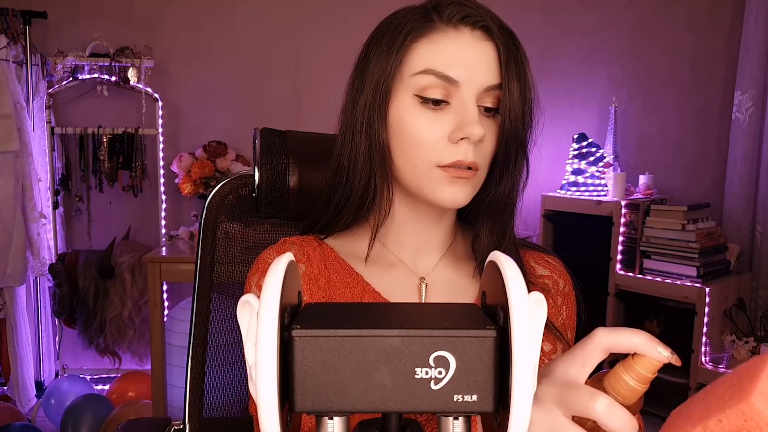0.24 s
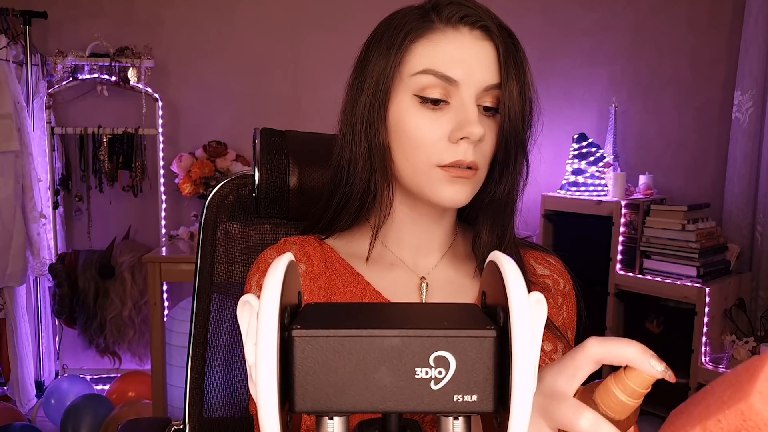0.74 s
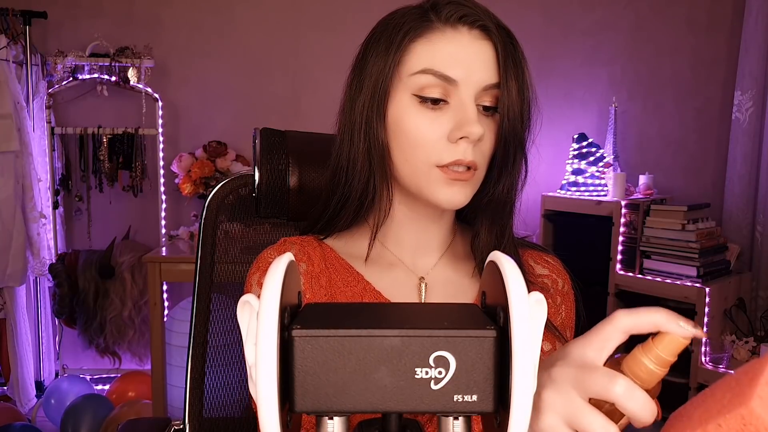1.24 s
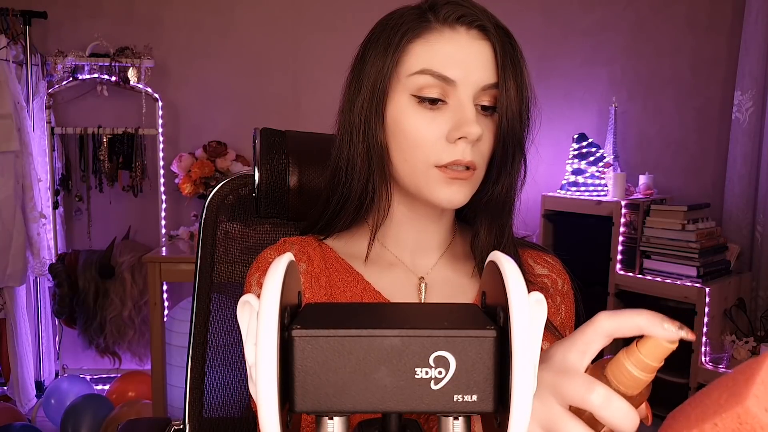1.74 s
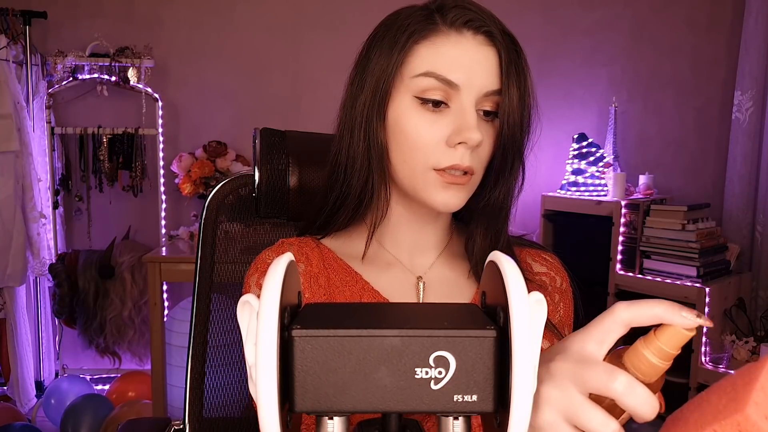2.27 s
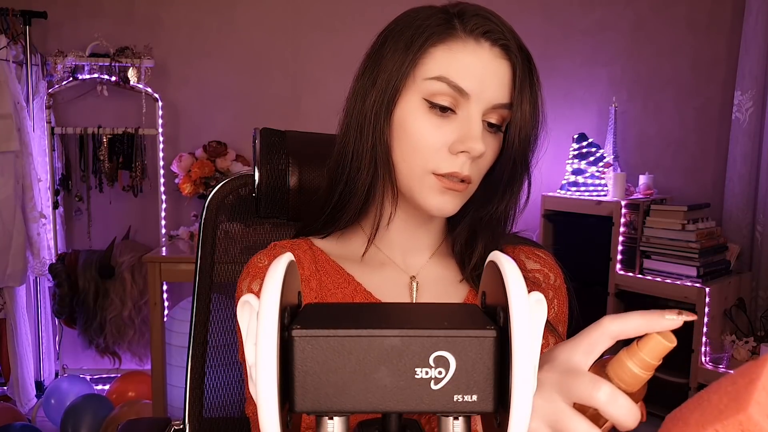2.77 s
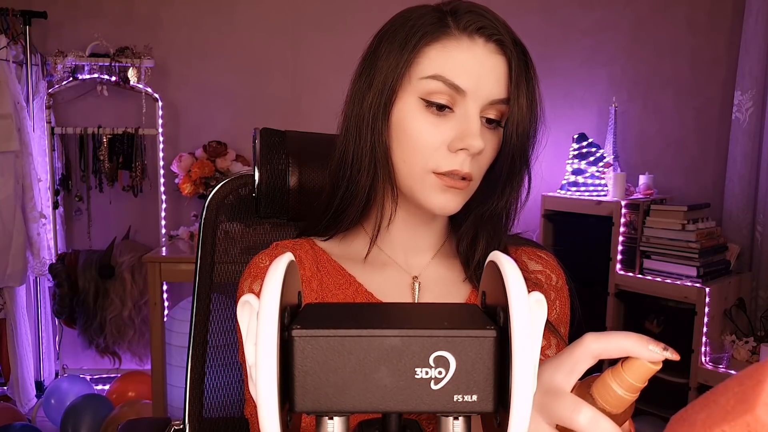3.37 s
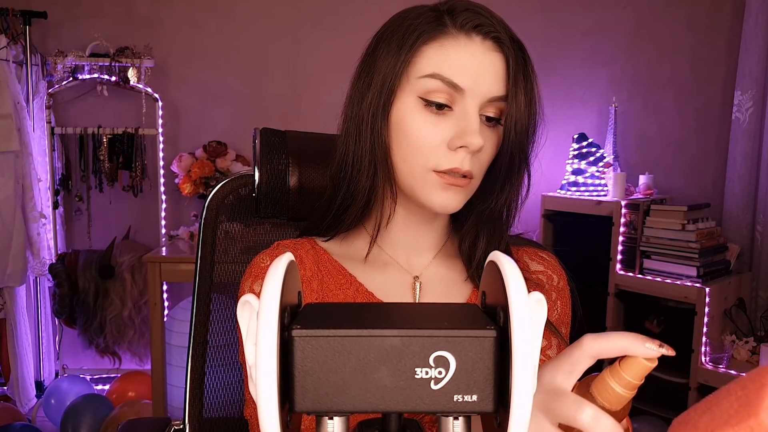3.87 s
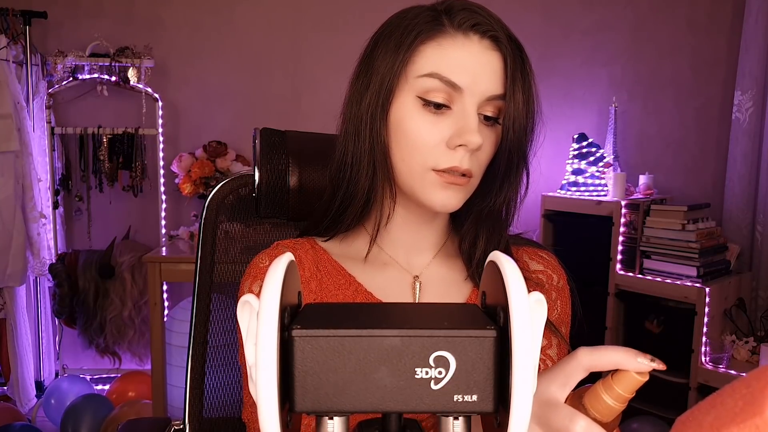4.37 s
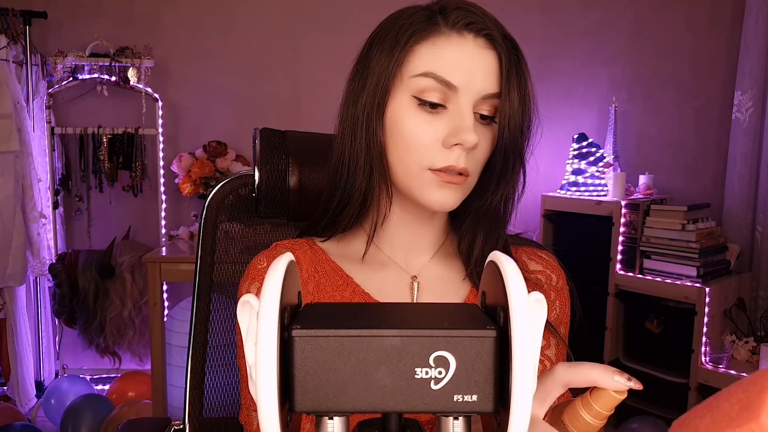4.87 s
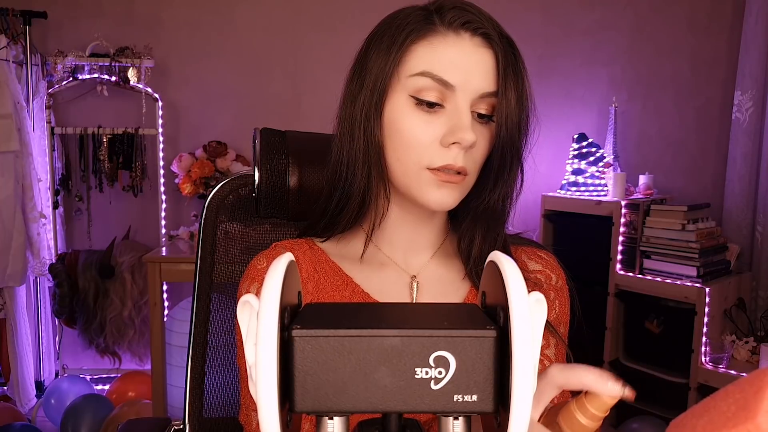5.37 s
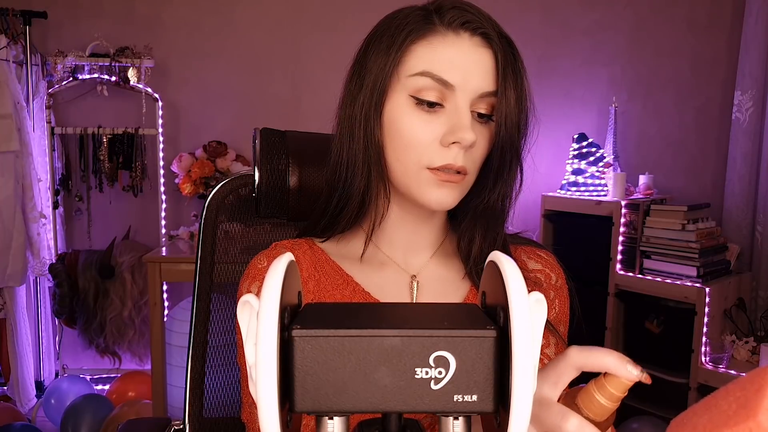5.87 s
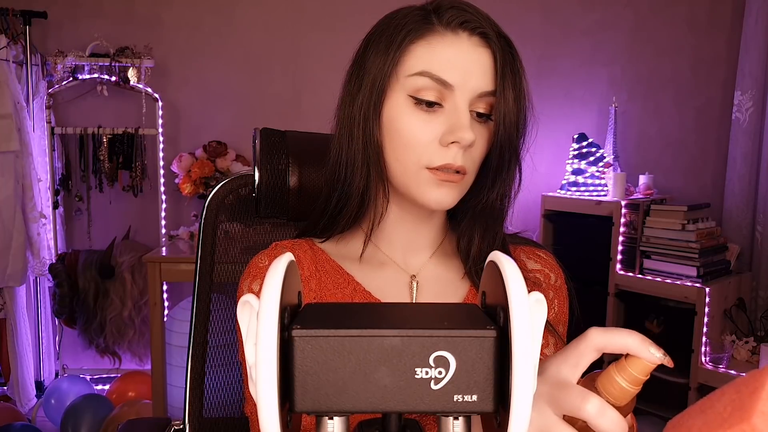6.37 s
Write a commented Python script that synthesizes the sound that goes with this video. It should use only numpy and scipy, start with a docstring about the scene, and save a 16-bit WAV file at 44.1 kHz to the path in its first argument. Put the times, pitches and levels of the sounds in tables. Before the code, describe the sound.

Close, steady spritzes from a small pump sprayer at the right, about two per second, with gurgly refill sucks, clicks and knocks between them.

```python
"""In a small furnished room, a plastic pump bottle is spritzed twelve times beside a listener's right ear.
Each stroke: the finger nudges the cap, a burst of noise hisses from the nozzle, then the piston springs back.
It slurps up liquid (the faster, the louder), thumps on its stop, and the ball valve drops shut.
Hiss and slurp are shaped noise; knocks and ticks are dying sine waves.
The room adds a noise-like tail and booming low notes, over a steady rumble and faint hiss."""
import sys
import numpy as np
from scipy import signal
from scipy.fft import rfft, irfft, next_fast_len
from scipy.io import wavfile
from scipy.ndimage import map_coordinates

SR = 44100
rng = np.random.default_rng(int(sys.argv[2]) if len(sys.argv) > 2 else 0)


def unload_wav(signal):
    """Save mono or channel-first audio to the path in sys.argv[1] as 16-bit WAV at rate SR, clipped to [-1, 1]."""
    wavfile.write(
        sys.argv[1],
        SR,
        np.round(np.clip(np.atleast_2d(signal).T, -1, 1) * 32767).astype(np.int16),
    )


N = 291942  # length of the scene in samples
T = np.arange(SR // 5) / SR  # time within one event, in seconds
LEAD_S = 0.01  # gated sounds are placed this much early, so their soft start fits


def amp(db):
    """Turn decibels into gain."""
    return 10 ** (np.asarray(db) / 20)


def unit(x):
    """Scale a sound to an average (rms) level of 1."""
    return x / np.sqrt(np.mean(x ** 2) + 1e-20)


def along(points, hz):
    """Read a curve of (pitch_hz, value) points, spacing the pitches as the ear does."""
    point_hz, values = np.transpose(points)
    return np.interp(np.log(hz + 1), np.log(point_hz + 1), values)


def filtered(x, response):
    """Shape the spectrum of x with a response that depends on frequency."""
    n = x.shape[-1]
    padded = next_fast_len(n + min(n, SR))  # spare room, so the end does not wrap onto the start
    spectrum = rfft(x, padded) * response(np.fft.rfftfreq(padded, 1 / SR))
    return irfft(spectrum, padded)[..., :n]


def resonances(peaks, f):
    """Response of objects that favour certain pitches; neighbouring peaks have opposite signs."""
    total = 0
    for k, (pitch_hz, width_hz, level_db) in enumerate(peaks):
        damping = 1j * f * width_hz
        total = total + (-1) ** k * amp(level_db) * damping / (pitch_hz ** 2 - f ** 2 + damping)
    return total


def noise(n, response):
    """Noise with a shaped spectrum and an rms level of 1."""
    return unit(filtered(rng.standard_normal(n), response))


def wobble(t, rate):
    """A smooth random curve through `rate` random points a second."""
    return map_coordinates(rng.standard_normal(int(t[-1] * rate) + 4), [t * rate])


def gate(t, length, rise, fall):
    """A level curve that opens at 0 and closes at length, with soft edges."""
    opening = 1 + np.tanh(t / rise)
    closing = 1 - np.tanh((t - length) / fall)
    return opening * closing / 4


def add(track, start_s, sound):
    """Mix a sound into the track from start_s on."""
    part = track[max(0, round(start_s * SR)):][:len(sound)]
    part += sound[:len(part)]


def ring(modes, attack, scatter_db, detune):
    """A struck object: dying sine waves, a little different at every blow, scaled to peak 1."""
    total = np.zeros(len(T))
    for pitch_hz, level_db, t60_s in modes:
        level_luck, pitch_luck = rng.standard_normal(2)
        decay = amp(level_db + scatter_db * level_luck - 60 * T / t60_s)
        total += decay * np.sin(2 * np.pi * pitch_hz * (1 + detune * pitch_luck) * T)
    total *= 1 - np.exp(-T / attack)
    return total / np.abs(total).max()


def crack(t60, top_hz=7000):
    """The brief noise burst of plastic parts touching; t60 is the time to fall by 60 dB."""
    return noise(len(T), lambda f: 1 / (1 + (f / top_hz) ** 2)) * amp(-60 * T / t60)


# Where the hand holds the bottle: time_s, forward (0 = straight beside the ear, 1 = a little in front)
HAND_PATH = [(0.1, 0.44), (.65, 0.081), (1.85, 0.022), (3.55, 0.36), (4.1, 1), (6.3, 0.99)]


def forward(s):
    """How far forward the bottle is at time s, gliding between the points of the path."""
    return np.interp(s, *np.transpose(HAND_PATH))


# The finger presses and the nozzle opens: start_s, length_s
SPRAYS = [(0.0762, 0.059), (0.646, 0.054), (1.2481, .054), (1.843, 0.056), (2.422, 0.05), (2.9913, 0.053),
          (3.5353, 0.055), (4.062, .054), (4.6009, 0.054), (5.1567, 0.051), (5.6958, 0.054),
          (6.2519, 0.051)]
# Spectrum of the droplet hiss: pitch_hz, level_db (relative, per Hz)
MIST_SPECTRUM = [(60, -27.5), (400, -16.5), (1100, -14.5), (1750, -6.5), (2200, -1.5), (2600, -7.5),
                 (3900, -3.5), (4900, -0.5), (6500, -6), (8600, -15.5), (10300, -18.5), (12300, -15),
                 (13800, -28), (16000, -22)]
# Sharp notes at the top of the hiss: pitch_hz, width_hz, level_db (relative)
NOZZLE_PEAKS = [(9860, 1250, 14), (10600, 720, -35)]
# Hiss beside the ear; held forward it is softer and brighter
SPRAY_DB, FORWARD_SPRAY_DB, FORWARD_BRIGHT_DB = -27, -1.5, 2
SPRAY_RISE_S, SPRAY_FALL_S = 0.0016, 0.0023


def mist(swell_db=2, flutter_db=0.94, tilt=0.32, nozzle_db=-17, aim=3.4, bounce_db=0.5, bounce_hz=115):
    """The jet tears into droplets: a flat-topped hiss that swells as pressure builds."""
    out, t = np.zeros(N), T - LEAD_S
    for start, length in SPRAYS:
        level_db = SPRAY_DB + FORWARD_SPRAY_DB * forward(start)
        bright_db = FORWARD_BRIGHT_DB * forward(start)

        def droplets(f):
            treble_db = tilt * bright_db * np.log10((f + 500) / 4000)
            return amp(along(MIST_SPECTRUM, f) + treble_db)

        hiss = noise(len(T), droplets)
        # the top of the hiss sharpens as the nozzle turns
        sharp = noise(len(T), lambda f: resonances(NOZZLE_PEAKS, f) * (f / (f + 6000)) ** 2)
        hiss += amp(nozzle_db + aim * bright_db) * sharp
        pressure_db = swell_db * (np.clip(t / length, 0, 1) - 0.5)
        pressure_db += flutter_db * wobble(T, rate=469.5)
        # the valve overshoots and bounces as it opens
        pressure_db += bounce_db * np.exp(-np.abs(t) / 0.019) * np.cos(2 * np.pi * bounce_hz * t)
        shape = gate(t, length, SPRAY_RISE_S, SPRAY_FALL_S)
        add(out, start - LEAD_S, amp(level_db + pressure_db) * unit(hiss) * shape)
    return out


# Low notes of the jolted bottle: pitch_hz, level_db (relative), t60_s (time to fall by 60 dB)
KICK_MODES = [(115.6, 2.5, 0.036), (167, -10, 0.028)]


def kicks(open_db=-32.5, shut_db=-33.5):
    """The outlet valve jolts the bottle as it opens and again as the piston bottoms out."""
    out = np.zeros(N)
    for start, length in SPRAYS:
        opening = ring(KICK_MODES, attack=0.008, scatter_db=2, detune=0.05)
        shutting = ring(KICK_MODES, attack=0.0045, scatter_db=7, detune=0.025)
        add(out, start - 0.001, -amp(open_db) * opening)
        add(out, start + length - 0.0005, -amp(shut_db) * shutting)
    return out


# The finger lets go and the piston rises to its stop: start_s, length_s, thump_db
RETURNS = [(0.288, 0.056, -22.5), (0.86, 0.047, -23), (1.467, 0.066, -27), (2.066, 0.059, -46),
           (2.640, 0.048, -21.5), (3.204, 0.068, -36.5), (3.745, .0555, -24), (4.272, 0.059, -29),
           (4.805, .071, -31), (5.356, 0.052, -24.5), (5.899, 0.059, -26), (6.463, 0.066, -33)]
# Notes the pump body favours: pitch_hz, width_hz, level_db (relative)
PUMP_PEAKS = [(720, 340, -6.5), (1074, 220, -1), (1810, 140, 2), (4840, 2900, -6), (5310, 1000, 0.5),
              (9920, 860, -13.5)]
# Slurp of a usual return, and its gain with piston speed
SLURP_DB, USUAL_RETURN_S, SLURP_DB_PER_DOUBLING = -35.5, 0.057, 9.5
# A softer thump than this means that the finger brakes the piston, and the flow with it
FREE_THUMP_DB = -21.5
# The chamber's note stands out, and the flow softens, with the bottle held forward
CHAMBER_DB, FORWARD_CHAMBER_DB, FORWARD_FLOW_DB = -5, 1, -3.5
CHAMBER_WIDTH_HZ, CHAMBER_BEND = 300, 2.1  # the bend makes most of the climb come late


def chamber_note(pitch):
    """The air pocket's resonance: a narrow band of noise carried along on the pitch."""
    phase = 2 * np.pi * np.cumsum(pitch) / SR
    total = np.zeros(len(T))
    for wave in (np.sin, np.cos):
        total += noise(len(T), lambda f: 1 / (1 + (f / CHAMBER_WIDTH_HZ) ** 4)) * wave(phase)
    return total


def refills(first_hz=2200, last_hz=3170, body_swell_db=2, fizz_db=-25, gulp_hz=62, gulp_db=2,
            grain_db=5, run_on=0.00267):
    """Liquid is sucked up in gulps; the air pocket in the chamber shrinks, so its pitch climbs."""
    out, t = np.zeros(N), T - LEAD_S
    for start, length, thump_db in RETURNS:
        place, flow_s = forward(start), length + run_on  # the flow runs on a little past the stop
        travel = np.clip(t / flow_s, 0, 1)
        speed_db = SLURP_DB_PER_DOUBLING * np.log2(USUAL_RETURN_S / length)
        brake_db = min(0, thump_db - FREE_THUMP_DB) * travel ** 3
        chamber = chamber_note(first_hz + (last_hz - first_hz) * travel ** CHAMBER_BEND)
        chamber *= amp(CHAMBER_DB + FORWARD_CHAMBER_DB * place)
        # gulps are strongest while the chamber is still empty
        gulps = gulp_db * (1 - travel) * np.cos(2 * np.pi * gulp_hz * (t - 0.004))
        flow = rng.standard_normal(len(T)) * amp(grain_db * wobble(T, rate=457))
        pumped = filtered(flow, lambda f: resonances(PUMP_PEAKS, f) / (1 + (f / 11000) ** 4))
        body = 0.5 * unit(pumped) + amp(fizz_db) * unit(flow)
        body *= amp(gulps + body_swell_db * travel + FORWARD_FLOW_DB * place)
        level = amp(SLURP_DB + speed_db + brake_db)
        shape = gate(t, flow_s, rise=0.003, fall=0.002)
        add(out, start - LEAD_S, level * (chamber + body) * shape)
    return out


# Notes of a ticking valve: pitch_hz, level_db (relative), t60_s
VALVE_MODES = [(770, 1.5, 0.0086), (1650, -1, 0.01), (3330, -9, 0.0066), (4320, -0.5, 0.0089),
               (5250, 6, 0.0074)]


def tick():
    """One tick of a valve: a short ring and a crack of contact."""
    note = ring(VALVE_MODES, attack=0.00094, scatter_db=3, detune=0.067)
    return note + 0.14 * crack(t60=0.003)


# Two bubbles open every return: delay_s (after its start), ping_db, tick_db (the valve)
BUBBLES = [(.0055, -32, -35.5), (0.0197, -31, -27.5)]
# Notes of a bubble's ping: pitch_hz, level_db (relative), t60_s
BUBBLE_MODES = [(4740, -4, 0.012), (5330, -4, 0.014)]
FORWARD_BUBBLE_DB = -9  # bubbles are softer with the bottle held forward


def bubbles():
    """Bubbles pass the inlet valve as the piston starts to rise: each pings and flicks the valve."""
    out = np.zeros(N)
    for start, _, _ in RETURNS:
        gain = amp(FORWARD_BUBBLE_DB * forward(start))
        for delay, ping_db, tick_db in BUBBLES:
            ping = ring(BUBBLE_MODES, attack=0.002, scatter_db=2, detune=0.04)
            add(out, start + delay - 0.001, gain * (amp(ping_db) * ping + amp(tick_db) * tick()))
    return out


# Low notes of the thumped bottle: pitch_hz, level_db (relative), t60_s
BOTTLE_MODES = [(128.5, 1, 0.12), (156, -3.5, 0.08), (173, -26, 0.14), (234, -17, 0.15)]
# Notes of the knocked plastic: pitch_hz, level_db (relative), t60_s
PLASTIC_MODES = [(695, -1, 0.023), (904, -4.5, 0.01), (1626, 1, 0.014), (2250, 5, 0.0096),
                 (2510, -24, 0.007), (3170, -2, 0.0105), (4880, -6, 0.0036)]
# Knock of a hard stop; it grows faster than the thump (knock dB per thump dB)
KNOCK_DB, HARD_THUMP_DB, KNOCK_GROWTH = -21, -23, 1.78
BALL_DROP_S, BALL_DB = 0.0275, -10  # the ball seats this long after the stop, this far under the knock
UNSEAT_S, UNSEAT_DB = 0.009, -49  # the outlet valve ticks this long before the spray


def knocks():
    """The outlet valve ticks before each spray; each return ends as the piston hits and the ball drops."""
    out = np.zeros(N)
    for start, _ in SPRAYS:
        add(out, start - UNSEAT_S, amp(UNSEAT_DB) * tick())
    for start, length, thump_db in RETURNS:
        stop = start + length
        knock_db = KNOCK_DB + KNOCK_GROWTH * (thump_db - HARD_THUMP_DB)
        thump = ring(BOTTLE_MODES, attack=0.008, scatter_db=1, detune=0.015)
        knock = ring(PLASTIC_MODES, attack=0.0015, scatter_db=2, detune=0.04)
        knock += 0.1 * crack(t60=0.012)
        add(out, stop - 0.0015, -amp(thump_db) * thump)
        add(out, stop, amp(knock_db) * knock)
        add(out, stop + BALL_DROP_S, amp(knock_db + BALL_DB) * tick())
    return out


# The finger shifts the cap: time_s, level_db
NUDGES = [(.251, -37), (.562, -30.5), (1.116, -35.5), (1.751, -33), (2.335, -41), (2.935, -27),
          (3.441, -34), (3.975, -39), (4.516, -38.5), (5.082, -36), (5.614, -35), (6.184, -33)]
# Notes of the bumped cap: pitch_hz, level_db (relative), t60_s
CAP_MODES = [(139.4, -1.5, 0.048), (191.5, -0.5, 0.043), (664, -3.5, 0.02), (1450, -27, 0.027)]
# Notes of the collar when rubbed: pitch_hz, width_hz, level_db (relative)
COLLAR_PEAKS = [(1686, 410, 0.5), (2340, 330, 5.5), (3000, 170, 2), (5350, 430, 1)]


def nudges(rub_db=-16, rub_lead=0.0021, rub_length=0.005):
    """The finger shifts the cap with a dull bump, and the stem rubs in its collar."""
    out = np.zeros(N)
    middle = 2 * LEAD_S  # the rub is loudest here within its own sound
    for s, level_db in NUDGES:
        add(out, s, -amp(level_db) * ring(CAP_MODES, attack=0.024, scatter_db=2.5, detune=0.051))
        # the rub peaks just before the cap seats
        rub = noise(len(T), lambda f: resonances(COLLAR_PEAKS, f) / (1 + (f / 8000) ** 2))
        rub *= np.exp(-((T - middle) / rub_length) ** 2)
        add(out, s - rub_lead - middle, amp(level_db + rub_db) * rub)
    return out


# The plastic head catches and snaps free: time_s, level_db
CLACKS = [(2.143, -33), (2.9525, -18), (2.976, -16.5), (5.471, -37.5), (6.021, -39)]
# Notes of the snap: pitch_hz, level_db (relative), t60_s
SNAP_MODES = [(138, -12, 0.057), (400, -14, 0.0097), (680, -6, 0.037), (783, 5, 0.009), (1086, 0.5, 0.0089),
              (1660, -7, 0.019), (2320, 5, 0.0084), (2850, -3.5, 0.015), (5100, -10, 0.0091)]


def clacks():
    """The sticking head snaps free with a hard plastic knock."""
    out = np.zeros(N)
    for s, level_db in CLACKS:
        snap = ring(SNAP_MODES, attack=0.0005, scatter_db=1, detune=0.03)
        add(out, s, amp(level_db) * (snap + 0.028 * crack(t60=0.0052)))
    return out


# Far ear against near ear: pitch_hz, level_db
HEAD_SHADOW = [(50, -6), (125, -7.5), (250, -7), (450, -15), (800, -14), (1300, -15.5), (2000, -12.5),
               (3200, -9.5), (4000, -12), (5000, -16), (7000, -16), (8500, -15.5), (10500, -22),
               (15000, -16)]
# The far ear hears later; this delay changes slightly with the bottle held forward
EAR_DELAY_S, FORWARD_DELAY_S = 0.000685, -0.00005


def ears(x, leak_db, unshadow_db=1.5):
    """The right ear hears x directly; the left hears it later and shadowed, less so held forward."""
    place = forward(np.arange(N) / SR)

    def shadow(f):
        # extra lower midrange bends round the head
        bend = along([(300, 0.2), (1500, 0), (4000, 0), (8000, 0)], f)
        return amp(along(HEAD_SHADOW, f) + leak_db * bend)

    delay_s = EAR_DELAY_S + FORWARD_DELAY_S * place
    far = map_coordinates(filtered(x, shadow), [np.arange(N) - SR * delay_s], order=5)
    far *= amp(unshadow_db * (place - place.mean()))
    return np.array([far, x])


# How long the room's tail takes to fall by 60 dB: pitch_hz, t60_s
ROOM_T60 = [(200, 0.23), (1000, 0.28), (4000, 0.39), (8000, 0.4), (15000, 0.22)]
# How strongly the room answers: pitch_hz, level_db
ROOM_SEND = [(100, -40), (250, -3.5), (450, -12), (1500, -15), (3500, -13.5), (5000, -17), (8000, -16),
             (10500, -22.5), (15000, -18)]
# Low notes at which the room booms: pitch_hz, width_hz, level_db (relative)
BOOM_MODES = [(113.6, 5.2, -7.5), (121.3, 3.7, -0.5), (135.3, 2.9, -4), (165.3, 5.4, 0.5), (189, 13, -1),
              (210, 9, -7), (255, 7.5, -9), (311.3, 3.3, 3.5)]


def room(x, build=0.001, boom_db=-6, boom_delay=0.0215):
    """A diffuse tail for each ear, ever new as the hand moves, and low standing waves both ears share."""
    out, size = np.zeros((2, N)), SR // 2
    for first in range(0, N, size):  # a fresh tail every half second
        hz, t, cells = signal.stft(rng.standard_normal((2, size)), SR, nperseg=256)
        # each pitch of the noise builds up quickly and dies at its own speed
        decay = amp(-60 * t / along(ROOM_T60, hz)[:, None]) * (1 - np.exp(-(t / build) ** 2))
        energy = np.mean(decay ** 2, axis=1, keepdims=True) * size
        decay *= amp(along(ROOM_SEND, hz))[:, None] / np.sqrt(energy)
        tails = signal.istft(cells * decay, SR, nperseg=256)[1]
        for ear, tail in zip(out, tails):
            add(ear, first / SR, signal.fftconvolve(x[first:first + size], tail))

    def standing_waves(f):
        waves = sum(resonances([mode], f) for mode in BOOM_MODES)
        return waves * np.exp(-2j * np.pi * f * boom_delay)  # the factor delays the boom

    return out + amp(boom_db) * filtered(x, standing_waves)


# Spectrum of the low rumble: pitch_hz, level_db (relative, per Hz)
RUMBLE_SPECTRUM = [(20, -21), (34, -1), (42, -9), (49, 10.5), (57, 0), (65, -2), (80, -13), (122, 1.5),
                   (145, 2), (200, -1.5), (300, -5.5), (450, -20.5), (1000, -27), (4000, -49)]
# Spectrum of the faint hiss: pitch_hz, level_db (relative, per Hz)
AIR_SPECTRUM = [(100, -14), (600, 7.5), (2500, 3), (6000, -2), (11000, -8), (13000, -18), (16000, -41)]


def background(rumble_db=-60, apart_db=-6, air_db=-72, waver_db=1):
    """Low rumble of the house, gently wavering and partly shared by both ears, under a faint hiss."""
    def steady(spectrum):
        return noise(N, lambda f: amp(along(spectrum, f)))

    shared = steady(RUMBLE_SPECTRUM)
    apart = np.array([steady(RUMBLE_SPECTRUM), steady(RUMBLE_SPECTRUM)])
    air = np.array([steady(AIR_SPECTRUM), steady(AIR_SPECTRUM)])
    level = amp(rumble_db + waver_db * wobble(np.arange(N) / SR, rate=5.2))
    return level * (shared + amp(apart_db) * apart) + amp(air_db) * air


def scene(pump_room_db=-2, clack_room_db=-5):
    """Jet, pump and snaps at the ears, their room and the background."""
    jet, snaps = mist(), clacks()
    pump = kicks() + refills() + bubbles() + knocks() + nudges()
    direct = ears(jet, leak_db=0) + ears(pump, leak_db=1) + ears(snaps, leak_db=2)
    into_room = jet + amp(pump_room_db) * pump + amp(clack_room_db) * snaps
    return direct + room(into_room) + background()


def record(dry, low_cut_hz=38, top_hz=15950):
    """Cut the deepest bass and keep nothing above top_hz."""
    def band(f):
        treble = np.clip((top_hz - f) / 200, 0, 1)
        bass = 1 - 1 / (1 + (f / low_cut_hz) ** 6)
        return treble * bass

    return filtered(dry, band)


dry = scene()
out = record(dry)
unload_wav(out)
```